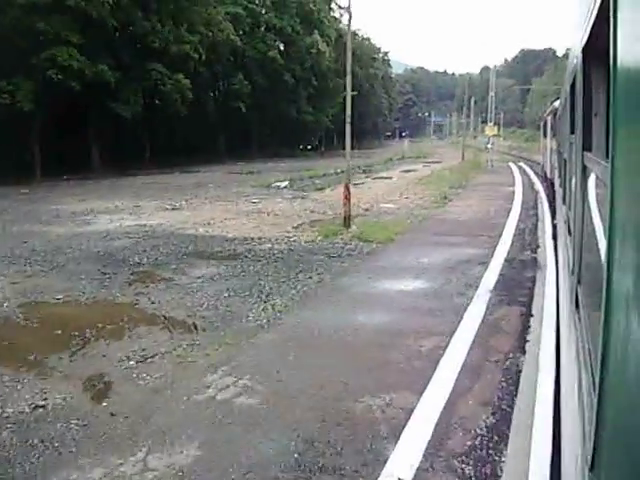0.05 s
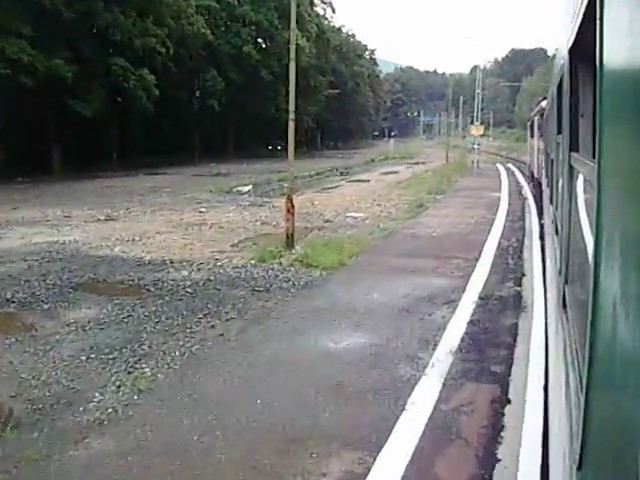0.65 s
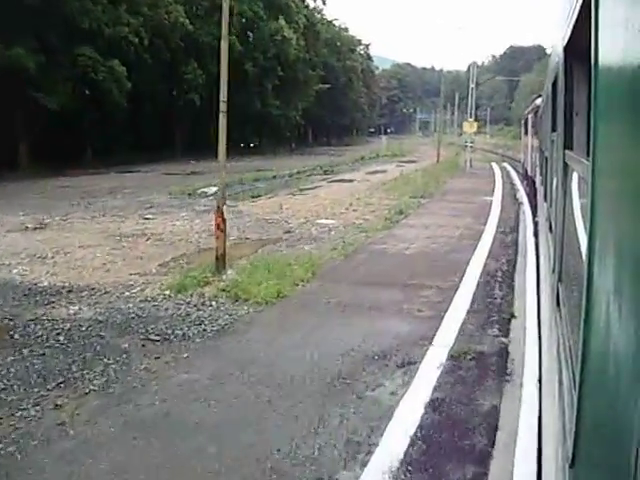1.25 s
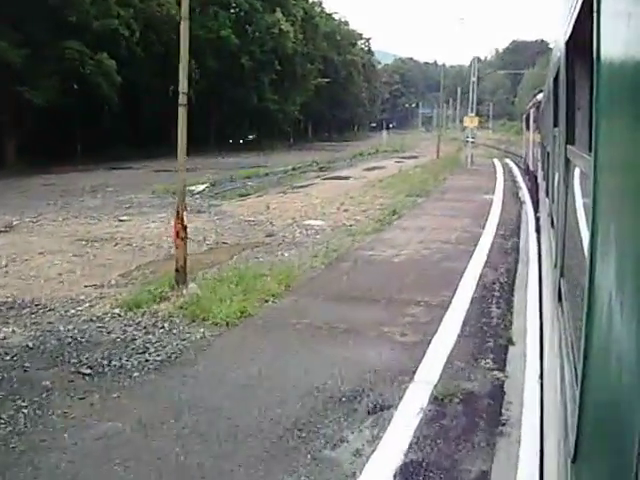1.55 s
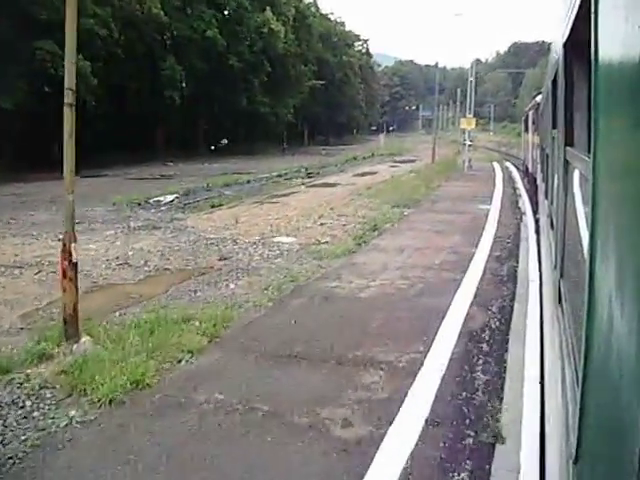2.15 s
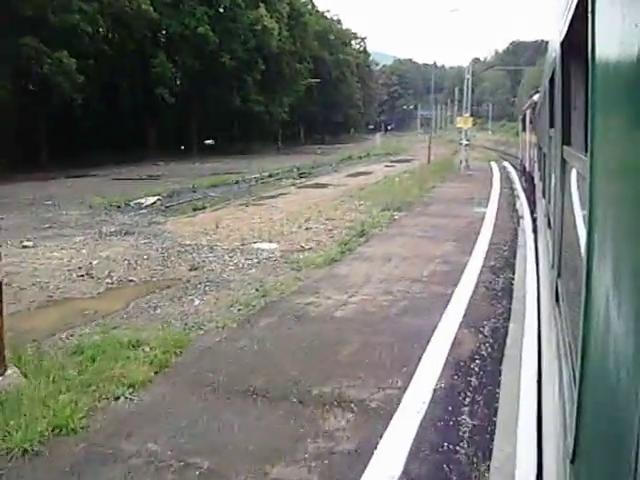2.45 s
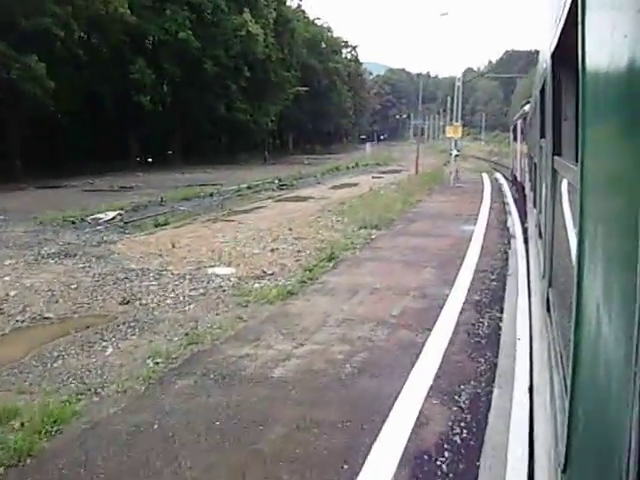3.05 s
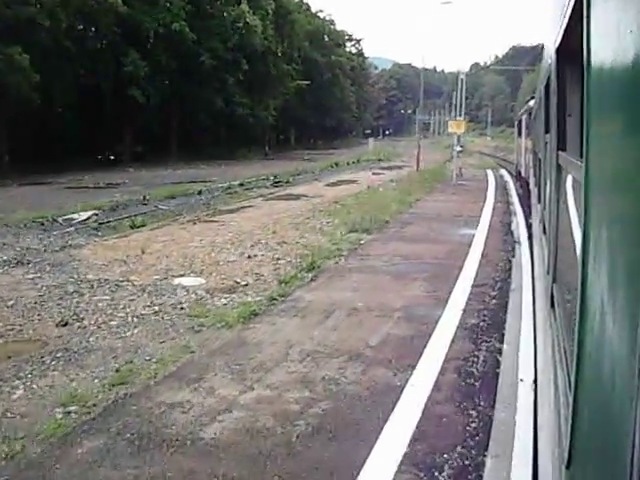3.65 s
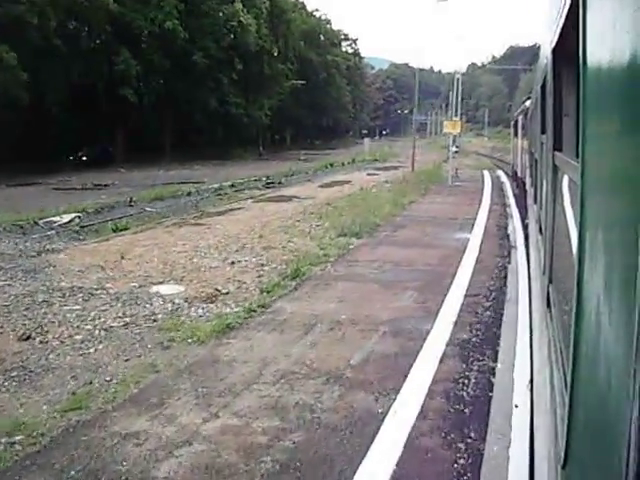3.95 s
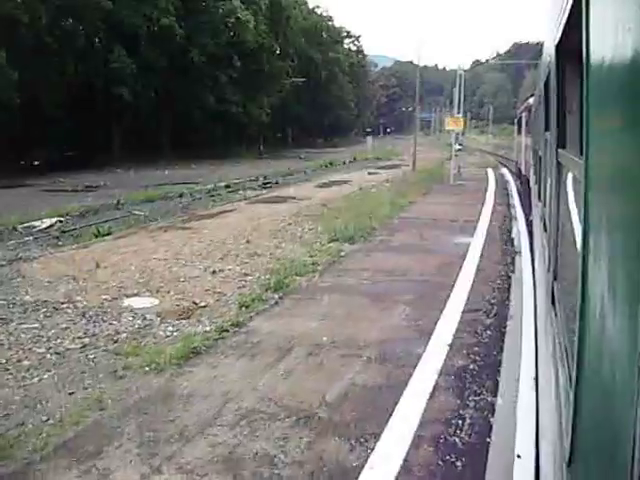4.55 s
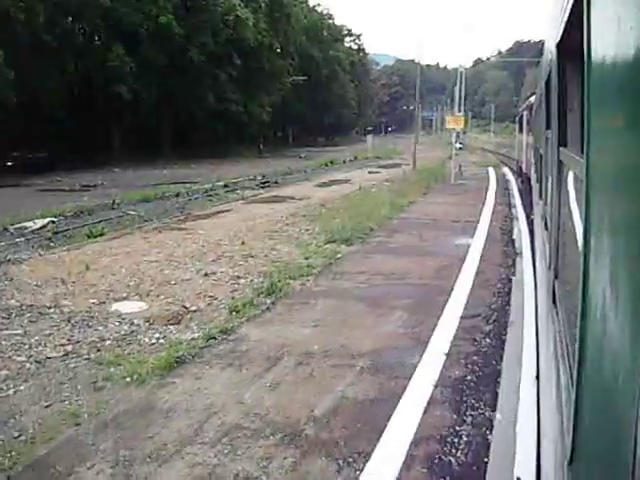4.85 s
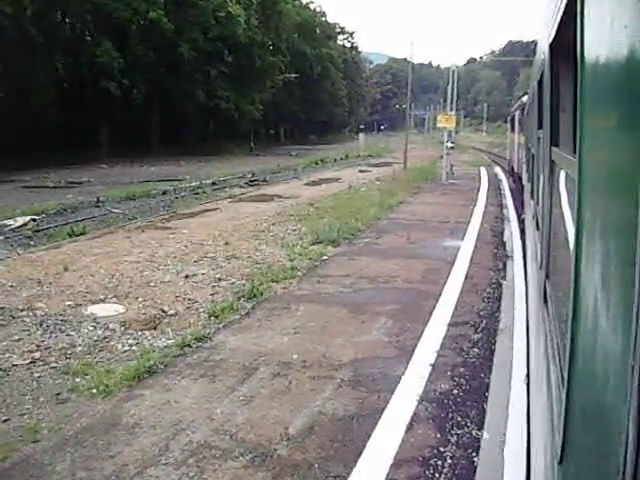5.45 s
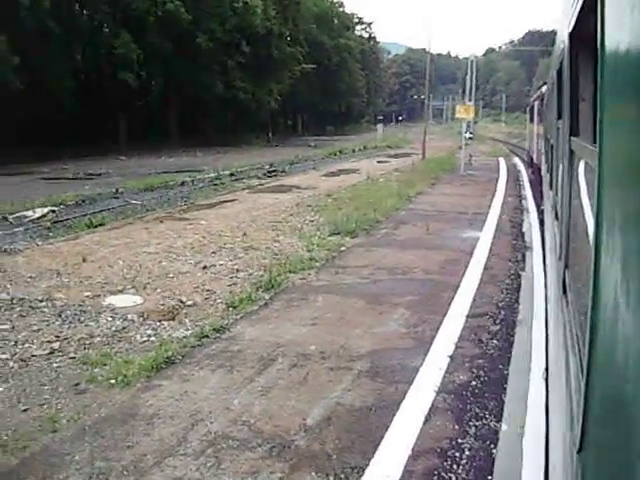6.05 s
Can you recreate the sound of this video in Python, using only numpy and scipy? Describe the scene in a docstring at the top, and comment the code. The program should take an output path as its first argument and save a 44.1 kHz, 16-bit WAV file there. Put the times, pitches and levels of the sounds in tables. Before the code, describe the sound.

At the open window of a braking train, rolling rumble and several dull, clanking thumps give way to a short, rough squeal and gritty metallic scraping with brief chirps. The rolling grows quieter as the train loses speed. Near the end a second, longer braking brings the loudest sound, a shrill, ringing wheel squeal with a lower rasp beneath, which fades at a crawl. Low gusts of wind hit the microphone throughout.

```python
"""At an open carriage window, as a passenger train brakes on curved track.
Stick-slip friction drives one wheel mode into a squeal, hoarse at speed and purer at a crawl.
The brake blocks grind twice, and the flanges scrape and chirp against the rail.
Rail joints thump under the bogies, the rolling rumble fades with the speed, and wind buffets."""
import sys
import numpy as np
from scipy import signal
from scipy.fft import rfft, irfft, next_fast_len
from scipy.io import wavfile

SR = 44100
rng = np.random.default_rng(int(sys.argv[2]) if len(sys.argv) > 2 else 0)


def unload_audio(sound):
    """Save the sound as a 16-bit wav file, at the path given as the first command line argument."""
    columns = np.transpose(np.atleast_2d(sound))
    # keep every value between -1 and 1, then stretch to whole-number steps
    steps = np.round(np.clip(columns, -1, 1) * 32767)
    wavfile.write(sys.argv[1], SR, steps.astype(np.int16))


N = 277589
TIME = np.arange(N) / SR


def gain_of(db):
    """Amplitude ratio of a level in decibels."""
    return 10 ** (np.asarray(db) / 20)


def unit_rms(x):
    """Normalisation to rms 1."""
    return x / np.sqrt(np.mean(abs(x) ** 2) + 1e-20)


def follow(rows, column=1):
    """Linear interpolation of one column over time."""
    rows = np.asarray(rows, float)
    return np.interp(TIME, rows[:, 0], rows[:, column])


def gate(rows, fade=0.028):
    """A window: one while a curve lasts, fading to zero outside it."""
    return np.clip(1 + np.minimum(TIME - rows[0][0], rows[-1][0] - TIME) / fade, 0, 1)


def burst(start, length, attack_s, release_s):
    """An envelope: linear rise, hold until the length is over, exponential decay."""
    age = TIME - start
    return np.clip(age / attack_s, 0, 1) * np.exp(-np.maximum(age - length, 0) / release_s)


def noise(spectrum):
    """Spectral shaping of white noise by (f/Hz, level/dB) points."""
    size = next_fast_len(N)
    hz, db = np.transpose(spectrum)
    shape_db = np.interp(np.log(np.fft.rfftfreq(size, 1 / SR) + 1), np.log(hz), db)
    return unit_rms(irfft(rfft(rng.standard_normal(size)) * gain_of(shape_db), size)[:N])


def flutter(width_hz, order=2):
    """Random excitation: the wandering complex amplitude of a mode under friction."""
    size, step = 2 ** 14, 32
    hz = np.fft.fftfreq(size, step / SR)
    force = rng.standard_normal(size) + 1j * rng.standard_normal(size)
    swing = np.fft.ifft(force / (1 + 2j * hz / width_hz) / (1 + .5j * hz / width_hz) ** (order - 1))
    return unit_rms(np.interp(np.arange(N) / step, np.arange(size), swing))


def waver(width_hz):
    """Slow random modulation of rms 1."""
    return unit_rms(flutter(width_hz, order=3).real)


def ring(hz, amplitude):
    """Modal vibration: a carrier of fixed or moving frequency times a complex amplitude."""
    return np.sqrt(2) * (amplitude * np.exp(2j * np.pi * np.cumsum(hz * np.ones(N)) / SR)).real


def saturated(swing, knee):
    """Saturation: stick-slip limits a mode's swing, so its level steadies while its phase drifts."""
    return unit_rms(swing / np.sqrt(knee ** 2 + abs(swing) ** 2))


# Envelope of the sustained squeal: t/s, level/dB
SQUEAL_LEVEL = [(1.2, -45), (1.46, -38.5), (1.5, -30), (1.75, -22), (1.97, -23.5), (2.04, -35), (2.8, -38),
                (3.3, -39.5), (3.65, -50), (4.18, -34.5), (4.5, -34.5), (4.66, -28.5), (5.05, -28),
                (5.2, -20), (5.52, -19.5), (5.62, -26.5), (5.85, -38), (6.29, -57)]
# Its tone: t/s, f/Hz, hoarseness (0 to 1)
SQUEAL_TONE = [(1.2, 4740, .9), (1.85, 4712, .6), (2.1, 4742, .75), (3.6, 4745, .6), (4.2, 4712, .2),
               (4.7, 4708, .04), (5.1, 4712, .008), (5.5, 4714, .001), (6.29, 4710, .004)]
# Flares as the wheel bites: t/s, duration/s, level/dB
BITES = [(1.755, .022, -16.5), (1.875, .028, -18), (4.645, .025, -21.5), (4.895, .033, -20),
         (4.96, .022, -17), (5.08, .045, -17.5), (5.222, .035, -15.5), (5.29, .03, -16.5),
         (5.428, .035, -17), (5.516, .048, -8.2)]


def squeal(beat_hz=20, drift_hz=5, second_db=-5, sizzle_db=0.5, stutter_hz=36):
    """Self-excited oscillation: the modes of two wheels beat; in a bite one wheel takes over."""
    pitch, hoarse = follow(SQUEAL_TONE, column=1), follow(SQUEAL_TONE, column=2)
    clean = ring(pitch + drift_hz * waver(25), 1)
    rough = ring(pitch, saturated(flutter(90), knee=1.2))
    first = np.sqrt(1 - hoarse) * clean + np.sqrt(hoarse) * rough
    second = gain_of(second_db) * ring(pitch - beat_hz, saturated(flutter(22, order=3), knee=.8))
    sizzle = gain_of(sizzle_db) * hoarse * ring(pitch + 55, flutter(190))
    # the contact grips and lets go while the two wheels compete
    stutter = 1 + .25 * ring(stutter_hz + 9 * waver(14), 1)
    envelope = gain_of(follow(SQUEAL_LEVEL)) * gate(SQUEAL_LEVEL)
    tone = envelope * stutter * (first + second)
    for start, length, db in BITES:
        bite = burst(start, length, attack_s=.02, release_s=.012)
        tone = (1 - bite) * tone + bite * gain_of(db) * first
    return tone + envelope * sizzle


# Bursts of the lower squeal: t/s, duration/s, level/dB
LOW_SQUEALS = [(5.148, .26, -21.5), (5.451, 0.09, -20)]


def low_squeal(hz=2364, wander_hz=22, rasp_db=-7):
    """Lock-in: at the hardest braking a second mode rasps about an octave under the main squeal."""
    swing = saturated(flutter(50, order=3), knee=1.0) + gain_of(rasp_db) * flutter(160)
    envelope = sum(gain_of(db) * burst(start, length, attack_s=.086, release_s=.04)
                   for start, length, db in LOW_SQUEALS)
    return envelope * ring(hz + wander_hz * waver(13.94), swing)


# Grip of the brake blocks in each application: t/s, level/dB
FIRST_GRIP = [(1.45, -38), (1.68, -28), (1.78, -21.5), (1.935, -21.5), (1.97, -36), (2.04, -42)]
LAST_GRIP = [(4.25, -38.5), (4.5, -37.5), (4.68, -28), (5.08, -24.5), (5.27, -20), (5.56, -22.5),
             (5.66, -34), (5.92, -42), (6.1, -53)]
# Spectrum of their grinding: f/Hz, level/dB
GRIND_SPECTRUM = [(200, -5.5), (500, -5), (950, -5.5), (1200, 5), (1550, -2.5), (2050, 1), (2500, 2),
                  (3000, -0.5), (3700, -11), (4300, -10), (5000, -20), (5700, -23.5), (6300, -36.5)]


def brake(grip, hiss_db, tone_db, hz, width_hz, grit_db=1.45, knee_db=-27):
    """Sliding friction: blocks on the treads excite a grainy hiss and one wheel mode."""
    grip_db = follow(grip)
    rub_db = grip_db - .5 * np.maximum(grip_db - knee_db, 0)  # the hiss grows less under a hard grip
    hiss = gain_of(rub_db + hiss_db + grit_db * waver(90)) * noise(GRIND_SPECTRUM)
    tone = gain_of(grip_db + tone_db) * ring(hz, flutter(width_hz, order=3))
    return gate(grip) * (hiss + tone)


# Wheel modes under the blocks: f/Hz, level/dB re the grip, bandwidth/Hz, lag/s
WHEEL_MODES = [(613, -17.5, 110, .05), (1174, -11, 17, 0.13), (1291, -9.5, 14, .03), (1415, -20.5, 45, .03),
               (1780, -18.5, 220, .01), (2290, -21, 36, .02), (2550, -29, 82, 0.11), (3410, -11.5, 25, .02),
               (3500, -15.5, 38, 0.035), (3960, -21.5, 35, 0.17), (4080, -16.5, 45, 0.022),
               (4524, -13.5, 6, 0.15), (4760, -12, 130, .02), (5280, -26, 80, .05)]


def wheel_modes(shift_db=2):
    """Resonance: each mode lags behind the last grip and swells at random as the contact shifts."""
    power = (gain_of(follow(LAST_GRIP)) * gate(LAST_GRIP)) ** 2
    out = np.zeros(N)
    for hz, db, width, lag in WHEEL_MODES:
        retained = np.exp(-1 / (lag * SR))
        swell = np.sqrt(signal.lfilter([1 - retained], [1, -retained], power))
        out += gain_of(db + shift_db * waver(2.7)) * swell * ring(hz, flutter(width))
    return out


# Groans just before the stop: t/s, duration/s, level/dB, f/Hz, bandwidth/Hz
GROANS = [(5.46, 0.2, -35.5, 745, 17), (5.52, 0.32, -37, 843, 8.2), (5.4, 0.072, -32, 1265, 120)]


def groans():
    """Forced vibration: at a crawl the blocks drag on the low modes of the wheels."""
    return sum(gain_of(db) * burst(start, length, attack_s=.061, release_s=.14) * ring(hz, flutter(width))
               for start, length, db, hz, width in GROANS)


# Scrape of the flanges pressing on the rail in the curve: t/s, level/dB
SCRAPE_LEVEL = [(0, -38), (.37, -39.5), (.66, -28), (.85, -31.5), (1.85, -25.5), (2.6, -28.5),
                (3.28, -30.5), (3.85, -36), (4.3, -40.5)]
# Its spectrum: f/Hz, level/dB
SCRAPE_SPECTRUM = [(1200, -31), (2200, -11.5), (2500, -2.5), (2750, 0.5), (3250, -4), (3600, -8.5),
                   (4300, -14), (4700, -13), (5100, -18), (5600, -22), (6300, -52)]
# A flange catches and sings: t/s, duration/s, level/dB, f/Hz
CATCHES = [(2.123, 0.22, -30, 2650), (2.31, 0.068, -24, 2717), (2.417, 0.064, -23.5, 2640),
           (2.585, 0.063, -25, 2667), (2.729, 0.077, -23.5, 2620), (2.88, 0.19, -25, 2624),
           (3.1, 0.13, -24, 2660), (3.4, 0.072, -23.5, 2664), (3.495, 0.041, -24.5, 2658),
           (3.71, 0.077, -24.5, 2640), (3.951, 0.12, -27, 2757)]


def flanges(whine_hz=3134, wander_hz=110, whine_db=-5, catch_scrape_db=-6, grit_db=1.0):
    """Flange friction: a gritty scrape and whine, which swell at each catch while one mode sings."""
    rub = noise(SCRAPE_SPECTRUM)
    whine = gain_of(whine_db) * ring(whine_hz + wander_hz * waver(10), flutter(65, order=3))
    drift_hz = 20 * waver(12)
    swing = saturated(flutter(60, order=3), knee=1.0)
    press = gain_of(follow(SCRAPE_LEVEL)) * gate(SCRAPE_LEVEL)
    song = np.zeros(N)
    for start, length, db, hz in CATCHES:
        catch = gain_of(db) * burst(start, length, attack_s=.021, release_s=.036)
        song += catch * ring(hz + drift_hz, swing)
        press = np.hypot(press, gain_of(catch_scrape_db) * catch)
    return press * gain_of(grit_db * waver(70)) * (rub + whine) + song


# Flange chirps: t/s at the peak, duration/s, level/dB, f/Hz, second harmonic/dB re the first
CHIRPS = [(.719, .06, -29, 3200, -58), (.863, 0.051, -26, 2710, -55), (.977, 0.044, -28, 2835, -64),
          (1.3, .09, -30, 3340, -64), (3.62, .1, -30.5, 3230, -60), (4.065, 0.052, -31, 2025, -29),
          (4.385, .08, -31, 2065, -24), (4.45, .04, -34, 1874, -34), (4.55, 0.043, -32.5, 1950, -38),
          (4.562, 0.045, -27.5, 3570, -60), (4.563, .045, -32, 2920, -62), (4.818, .09, -19, 1904, -13),
          (5.135, 0.049, -21, 3530, -74)]


def chirps(sag_hz_per_s=1500, width_hz=98, third_db=-19):
    """Transient slip: a flange sounds a brief falling tone with two harmonic overtones."""
    out = np.zeros(N)
    for peak, length, db, hz, overtone_db in CHIRPS:
        age = np.clip(TIME - peak, -2 * length, 2 * length)
        pitch = hz - sag_hz_per_s * age
        swing = saturated(flutter(width_hz), knee=0.95)
        overtones = ring(2 * pitch, swing ** 2) + gain_of(third_db) * ring(3 * pitch, swing ** 3)
        envelope = gain_of(db) * np.exp(-(2 * age / length) ** 2)
        out += envelope * (ring(pitch, swing) + gain_of(overtone_db) * overtones)
    return out


# Wheels striking rail joints: t/s, level/dB, thud decay time/s, clank/dB re the thud
JOINTS = [(.10, -21, 0.064, -7), (0.241, -11.5, 0.015, 4), (0.418, -16.5, 0.077, -5),
          (0.599, -16, 0.048, -6.5), (0.744, -17.5, 0.025, -2.5), (1.23, -16.5, 0.055, -8),
          (1.889, -12.5, 0.04, -22), (3.157, -24, 0.045, -14), (3.33, -22.5, 0.061, -21),
          (3.746, -21, 0.073, -11), (5.69, -26, 0.32, -24), (5.806, -21, 0.063, -30)]
# Spectra of the blow: f/Hz, level/dB
THUD_SPECTRUM = [(40, -2), (115, 2.5), (250, -5.5), (450, -8), (800, -17.5), (1300, -27), (2500, -42),
                 (6000, -63)]
CLANK_SPECTRUM = [(200, -21), (450, 5), (750, 2), (1100, -2), (1600, -12.5), (3000, -31), (6000, -47.5)]


def joints(rise_s=0.0022):
    """Impact excitation: each joint shakes the bogie with a dull thud and a shorter clank of steel."""
    thuds, clanks = np.zeros(N), np.zeros(N)
    for start, db, decay, clank_db in JOINTS:
        age = np.maximum(TIME - start, 0)
        blow = gain_of(db) * (1 - np.exp(-age / rise_s)) * np.exp(-age / decay)
        thuds += blow
        clanks += gain_of(clank_db) * blow * np.exp(-.5 * age / decay)
    return thuds * noise(THUD_SPECTRUM) + clanks * noise(CLANK_SPECTRUM)


# The slowing train: t/s, speed/initial speed
SPEED = [(0, 1), (1.3, 0.75), (2.8, 0.57), (4.3, .34), (5.5, 0.21), (5.85, 0.13), (6.29, 0.053)]
# Spectra of bogie rumble and rail hiss: f/Hz, level/dB
BOGIE_SPECTRUM = [(50, -16), (100, 2), (170, -2.5), (280, -9), (420, -12), (650, -20.5), (1000, -21.5),
                  (2000, -38.5), (5000, -69)]
RAIL_SPECTRUM = [(250, -10.5), (600, 1.5), (930, -1.5), (1170, 2), (1550, -3), (1850, -2.5), (2150, -5.5),
                 (2900, -4.5), (3700, -14.5), (4250, -16.5), (4550, -7.5), (4850, -14.5), (5300, -20.5),
                 (5900, -51)]


def rolling(rumble_db=-18.5, rumble_db_per_decade=34.5, rail_db=-27, rail_db_per_decade=18):
    """Rolling noise: the sound of bogies, body panel, rails and wheel follows power laws of speed."""
    decades = np.log10(follow(SPEED))
    bogies = noise(BOGIE_SPECTRUM) * gain_of(1.34 * waver(12))
    panel = gain_of(-17) * ring(421, flutter(15))
    rails = gain_of(waver(27)) * noise(RAIL_SPECTRUM)
    wheel = gain_of(-22) * ring(4540, flutter(30))
    rumble = gain_of(rumble_db + rumble_db_per_decade * decades) * (bogies + panel)
    hiss = gain_of(rail_db + rail_db_per_decade * decades) * (rails + wheel)
    return rumble + hiss


# Envelope of the wind: t/s, level/dB
WIND_LEVEL = [(0, -25.5), (.32, -25.5), (.62, -23.5), (2.1, -19), (3.3, -22.5), (3.9, -21), (4.5, -28.5),
              (4.72, -23), (5.0, -26), (5.6, -28), (5.83, -22), (6.29, -24.5)]
# Its spectrum: f/Hz, level/dB
WIND_SPECTRUM = [(5, -23), (18, -5.5), (31, 1), (48, -5.5), (70, -7.5), (120, -22.5), (300, -47),
                 (1000, -83)]


def wind(gusts_db=2.0):
    """Turbulence: gusts buffet the microphone with low-frequency pressure fluctuations."""
    return gain_of(follow(WIND_LEVEL) + gusts_db * waver(20)) * noise(WIND_SPECTRUM)


# Spectrum of the carriage's own noise: f/Hz, level/dB
CARRIAGE_SPECTRUM = [(60, -1), (110, -3), (250, -9), (420, -12.5), (800, -20.5), (1200, -26.5), (1700, -40),
                     (2100, -36), (2800, -26.5), (3700, -35), (5000, -40.5), (6000, -54.5)]


def carriage(level_db=-32):
    """Stationary noise: the rumble and soft hiss of the carriage that remain at a crawl."""
    return gain_of(level_db) * noise(CARRIAGE_SPECTRUM)


def scene():
    """Superposition: all sources add at one point."""
    # fast turning broadens the mode in the first braking
    first_brake = brake(FIRST_GRIP, hiss_db=-2.5, tone_db=-1.0, hz=2424, width_hz=350)
    last_brake = brake(LAST_GRIP, hiss_db=0.5, tone_db=-3.5, hz=2357, width_hz=30)
    running = rolling() + wind() + carriage() + joints() + flanges() + chirps()
    braking = first_brake + last_brake + wheel_modes() + groans() + squeal() + low_squeal()
    return (running + braking)[None]


def low_pass(x, hz):
    """Windowed-sinc filtering: a steep cut above hz."""
    return signal.oaconvolve(x, signal.firwin(511, hz, window=("kaiser", 9), fs=SR)[None], "same")


def record(dry, edge_hz=6400, ceiling=.74):
    """Band limiting and clipping: a narrow-band channel just overloads on the loudest squeal."""
    clipped = np.clip(low_pass(dry, edge_hz), -ceiling, ceiling)
    return low_pass(clipped, 15800)


dry = scene()
out = record(dry)
unload_audio(out)
```